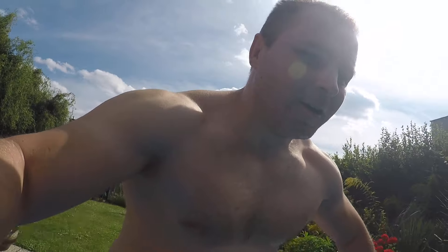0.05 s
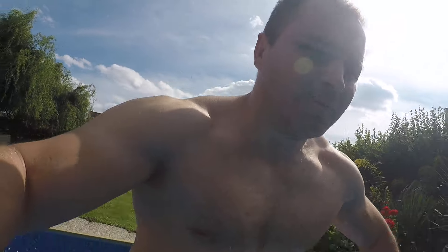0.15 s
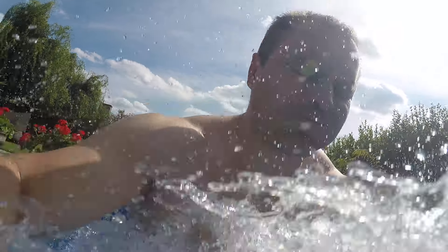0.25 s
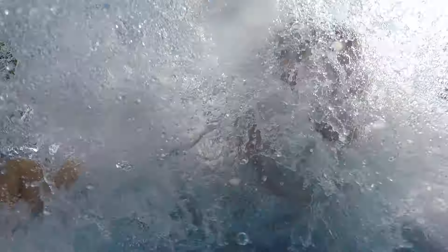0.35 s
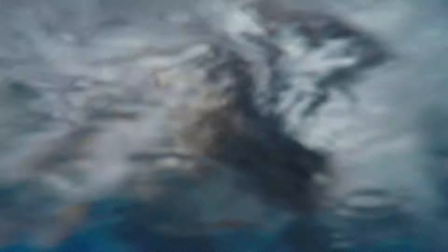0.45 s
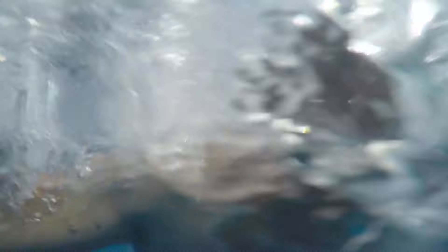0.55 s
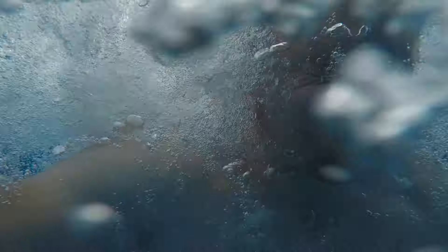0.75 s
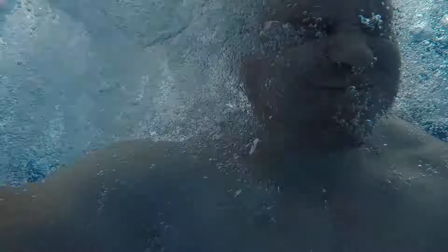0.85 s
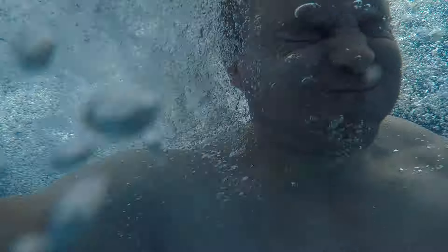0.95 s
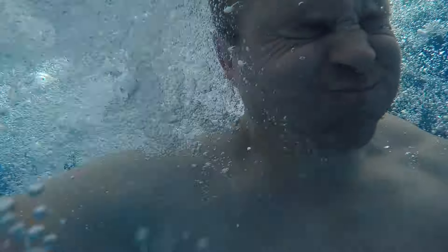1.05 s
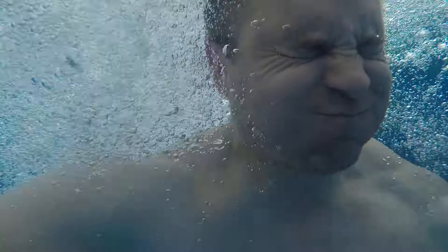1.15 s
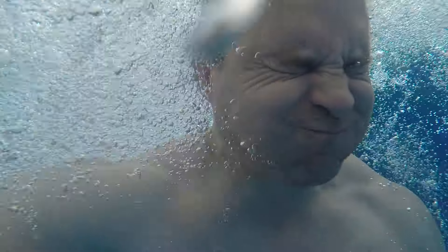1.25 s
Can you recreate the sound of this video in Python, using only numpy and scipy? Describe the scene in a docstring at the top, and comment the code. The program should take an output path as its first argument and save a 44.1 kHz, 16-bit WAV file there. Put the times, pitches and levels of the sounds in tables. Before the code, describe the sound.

A plunge into a garden pool heard from a camera in a waterproof case: brief spray hiss, violent distorted water slaps, foamy rush, a deep air-pocket boom, then quiet muffled gurgling, small bubble pings and low rumble.

```python
"""Water slaps a camera's waterproof housing as a body drops into a pool: short noise cracks and sine shoves,
hard enough to overload the microphone. A large air pocket booms as a rising sine; single bubbles glug and ping.
Clicks and noise hiss as spray through the housing's resonances. Swarms of ringing bubbles make the foam,
fizz and gurgle. Resonant noise buffets the case in air, low-passed noise rumbles under water."""
import sys
import numpy as np
from scipy import signal
from scipy.fft import rfft, irfft
from scipy.io import wavfile
from scipy.ndimage import uniform_filter1d

SR = 44100
rng = np.random.default_rng(int(sys.argv[2]) if len(sys.argv) > 2 else 0)


def pcm_store(signal):
    """Save signal as 16-bit PCM."""
    levels = np.round(np.clip(np.atleast_2d(signal), -1, 1) * 32767)
    wavfile.write(sys.argv[1], SR, levels.astype(np.int16).T)


N = 57330
T = np.arange(N) / SR

# the body breaking the surface: t/s, relative level/dB, decay/s
ENTRIES = [(0.1209, -20.5, 0.0042), (0.134, -16, 0.0022)]


def amp(db):
    """Decibels to gain."""
    return 10 ** (np.asarray(db) / 20)


def unit(x):
    """Scales to rms 1."""
    return x / np.sqrt(np.mean(x ** 2) + 1e-20)


def level(points, t=T):
    """Gain along a curve of t/s, level/dB."""
    return amp(np.interp(t, *np.transpose(points)))


def colour(x, points):
    """Minimum-phase filter with a spectrum of f/Hz, gain/dB; the result has rms 1."""
    hz, db = np.transpose(points)
    f_hz = abs(np.fft.fftfreq(2 * N, 1 / SR))
    log_gain = np.log(amp(np.interp(np.log(f_hz + 1), np.log(hz), db)))
    response = np.exp(np.conj(signal.hilbert(log_gain)))[:N + 1]
    return unit(irfft(rfft(x, 2 * N) * response)[:N])


def lowpass(x, hz, order=2):
    """Butterworth low-pass: takes off the treble."""
    return signal.sosfilt(signal.butter(order, min(hz, .45 * SR), fs=SR, output="sos"), x)


def resonate(x, hz, width_hz):
    """A steep resonance that can follow a moving pitch; the result has rms 1."""
    turn = np.exp(2j * np.pi * np.cumsum(hz * np.ones(N)) / SR)
    r = np.exp(-np.pi * width_hz / SR)
    # shift the pitch to 0 Hz, low-pass with a double pole, shift back
    return unit((turn * signal.lfilter([1], [1, -2 * r, r * r], x / turn)).real)


def steady(x, size):
    """Evens out slow level swings by the running rms over size samples."""
    return x / np.sqrt(abs(uniform_filter1d(x ** 2, size)) + 1e-9)


def drift(rate_hz):
    """A smooth random wander of rms 1: low-passed noise."""
    return unit(lowpass(rng.standard_normal(N), rate_hz))


def flutter(rate_hz, depth_db):
    """A random wobble of level, rms depth in dB."""
    return amp(depth_db * drift(rate_hz))


def clicks(per_s, spread_db):
    """Random clicks of either sign, a few much larger than the rest."""
    size = amp(spread_db * np.minimum(rng.exponential(1, N), 4))
    return (rng.random(N) < per_s / SR) * size * rng.choice([-1, 1], N)


def add(mix, s, sound):
    """Mixes a sound in at time s."""
    part = mix[max(round(s * SR), 0):][:len(sound)]
    part += sound[:len(part)]


def bubble(hz, decay_s, rise_s, glide_per_s):
    """A bubble rings, dies away and rises in pitch."""
    t = T[:N // 6]
    ring = np.sin(2 * np.pi * hz * (t + glide_per_s * t * t / 2))
    return ring * (1 - np.exp(-t / rise_s)) * np.exp(-t / decay_s)


def swarm(low_hz, high_hz, per_s, spread_db, cycles, chirp=0.0072, count=40):
    """A cloud of bubbles of many sizes, each ringing for a few cycles; rms 1."""
    out = np.zeros(N)
    for hz in np.geomspace(low_hz, high_hz, count) * rng.uniform(1.0, 1.03, count):
        decay_s = cycles / hz
        ring = bubble(hz, decay_s, .5 / hz, chirp / decay_s)[:int(8 * decay_s * SR)]
        out += signal.oaconvolve(clicks(per_s / count, spread_db), ring * hz)[:N]
    return unit(out)


def slaps():
    """Sheets of water crack against the housing (decaying noise) and shove it (short sine swells)."""
    # water slapping the housing: t/s, level/dB, decay/s
    cracks = [(0.3321, 4, 0.0012), (0.3361, -7.5, 0.0026), (0.3423, 3.5, 0.0024), (0.35, -7, 0.0023),
              (0.358, -9, 0.0022), (0.4624, -10.5, 0.011), (0.4645, 9, 0.0027), (0.4804, -9, 0.0071),
              (.547, -10.5, 0.0011), (.6, -28.5, 0.0067)]
    # spectrum of a slap: f/Hz, relative gain/dB
    crack_colour = [(60, -3), (220, 4), (500, -5), (1800, -4), (3900, -4.5), (4600, -10.5), (8000, -18),
                    (15500, -28.5)]
    # dull shoves of water against the case: t/s, level/dB, length/s, f/Hz
    shoves = [(0.339, -9, 0.006, 220), (0.353, -8.5, 0.013, 26.4), (0.398, -6.5, 0.032, 39.8),
              (0.408, -19, 0.0084, 168), (0.446, -2.5, 0.028, 29.8), (0.473, -6, 0.018, 64.8),
              (0.538, -26, 0.03, 76), (0.683, -8, 0.027, 76.7)]
    out = np.zeros(N)
    for s, db, decay_s in cracks:
        crack = steady(colour(rng.standard_normal(N), crack_colour), size=200)
        attack = np.minimum(T / 0.001, 1)
        add(out, s, amp(db) * crack * attack * np.exp(-T / decay_s))
    for s, db, length_s, hz in shoves:
        t = np.arange(0, length_s, 1 / SR)
        swell = np.sin(np.pi * t / length_s) ** .5
        add(out, s, amp(db) * np.sin(2 * np.pi * hz * t) * swell)
    return out


def bubbles():
    """The air pocket booms with a rising pitch; single large bubbles glug, small close ones ping."""
    # the big air pocket, a hard first swing then a long ring: t/s after it forms, level/dB
    pocket = [(0, 0), (.005, 2), (.016, 2), (.03, -11), (.09, -24), (.19, -38), (.23, -60)]
    # large bubbles: t/s, f/Hz, level/dB, decay/s
    glugs = [(0.554, 331.3, -12.5, 0.0097), (.597, 748, -22, 0.0084), (.665, 662, -19.5, 0.012),
             (0.685, 329, -2.5, 0.0049), (.699, 368.6, -8.5, 0.016), (0.97, 559, -18.5, 0.0049)]
    # small bubbles close to the case: t/s, f/Hz, level/dB, decay/s
    pings = [(.3318, 1950, -4, 0.0011), (0.631, 9100, -14.5, 0.00027), (0.6466, 2614, -7.5, 0.0012),
             (.661, 6560, -23.5, 0.0012), (0.7449, 3070, -17, 0.00065), (0.79, 3330, -24, 0.0026),
             (0.926, 1650, -28, 0.00077), (.939, 4770, -38, 0.00081), (0.9974, 5260, -37.5, 0.0017),
             (1.05, 3700, -35.5, 0.0024), (1.0758, 4070, -21.5, 0.0003), (1.12, 3240, -27.5, 0.0011),
             (1.134, 4100, -32, 0.0014), (1.19, 3500, -36.5, 0.0012), (1.2305, 1794, -27, 0.0064),
             (1.2501, 3000, -11.5, 0.0007), (1.26, 5920, -36, 0.00094)]
    pocket_s, pocket_hz, bend_per_s2 = .7035, 126.1, 3.0
    out = np.zeros(N)
    turns = np.cumsum(pocket_hz * (1 + bend_per_s2 * T ** 2)) / SR
    add(out, pocket_s, np.sin(2 * np.pi * turns) * level(pocket) * (T < pocket[-1][0]))
    for s, hz, db, decay_s in glugs:
        add(out, s, amp(db) * bubble(hz, decay_s, rise_s=0.00046, glide_per_s=0.97))
    for s, hz, db, decay_s in pings:
        add(out, s, amp(db) * bubble(hz, decay_s, rise_s=0.00033, glide_per_s=2.5))
    return out


def spray():
    """The body breaks the surface and countless drops hiss through the housing's shifting resonances."""
    # spray: t/s, relative level/dB
    spray_level = [(.123, -61), (.14, -32), (.178, -38), (.192, -30), (.37, -29.5), (.388, -24), (.44, -24),
                   (.455, -34.5), (.49, -31.5), (.56, -45.5), (.75, -100)]
    # spray heard through the housing: f/Hz, relative gain/dB
    spray_colour = [(200, -38), (1100, -17), (2500, -15.5), (3700, -6.5), (4800, -12), (5600, -16),
                    (8200, -23.5), (9800, -19), (11500, -29), (15500, -36)]
    # the housing's ring under the spray: f/Hz, width/Hz, relative level/dB
    housing = [(3480, 240, -11), (3930, 300, -5)]
    wander = .02  # rms share by which the ring shifts as water runs over the case
    entry_rise_s = 0.0023
    drops = unit(clicks(per_s=3400, spread_db=3.0)) + .5 * rng.standard_normal(N)
    drops = drops * flutter(rate_hz=50, depth_db=1.0)
    shift = 1 + wander * drift(rate_hz=84)
    ring = np.zeros(N)
    for hz, width_hz, db in housing:
        ring += amp(db) * resonate(rng.standard_normal(N), hz * shift, width_hz)
    ring = steady(ring, size=1000)
    bursts = np.zeros(N)
    for s, db, decay_s in ENTRIES:
        rise = np.clip((T - s) / entry_rise_s, 0, 1)
        bursts += amp(db) * rise * np.exp(-abs(T - s) / decay_s)
    return 0.81 * (colour(drops, spray_colour) + ring) * (level(spray_level) + bursts)


def foam():
    """Foam rushes and crackles round the case; under water a faint foam hiss stays, with a dull, sparse fizz."""
    # foam churning round the case: t/s, level/dB
    foam_level = [(.15, -91), (.24, -45), (.41, -28), (.452, -38.5), (.485, -27), (.56, -33), (.705, -32.5),
                  (.73, -44.5), (.79, -43), (.84, -54.5)]
    # spectrum of the foam: f/Hz, relative gain/dB
    foam_colour = [(300, -3.5), (1300, -5), (2400, -4.5), (4300, -14.5), (6000, -21), (15500, -35)]
    # tiniest bubbles crackling: t/s, level/dB
    crackle_level = [(.12, -72), (.5, -39), (.7, -51), (.8, -66), (.86, -90)]
    # fine bubbles fizzing under water: t/s, level/dB
    fizz_level = [(.5, -72), (.7, -42), (.86, -64), (1.18, -63), (1.22, -45), (1.3, -60)]
    # spectrum of the fizz: f/Hz, relative gain/dB
    fizz_colour = [(1000, 3.5), (2200, 1), (4200, -27), (8000, -29)]
    cloud = swarm(low_hz=578, high_hz=5970, per_s=2200, spread_db=4.5, cycles=3.3)
    surface = steady(colour(cloud + 0.69 * rng.standard_normal(N), foam_colour), size=1500)
    tiny = swarm(low_hz=4934, high_hz=14360, per_s=420, spread_db=7.0, cycles=5)
    fine = swarm(low_hz=806, high_hz=4370, per_s=260, spread_db=3.0, cycles=4.8)
    fizz = steady(colour(fine, fizz_colour), size=2000)
    return surface * level(foam_level) + tiny * level(crackle_level) + fizz * level(fizz_level)


def gurgle():
    """The muffled cloud of larger bubbles dragged under by the body; a few swell as wavering tones."""
    # gurgle of larger bubbles: t/s, level/dB
    gurgle_level = [(.2, -63.5), (.265, -45), (.5, -30), (.645, -42.5), (.7, -26), (.8, -30.5),
                    (.86, -34.5), (1.07, -39.5), (1.12, -34), (1.16, -38.5), (1.25, -30)]
    # spectrum of the gurgle: f/Hz, relative gain/dB
    gurgle_colour = [(120, -20.5), (220, -1), (340, -1), (560, -1.5), (780, -10.5), (1150, -17.5),
                     (5000, -56.5)]
    # wobbling bubbles that drift past under water: t/s, f/Hz, level/dB, length/s
    wobblers = [(0.754, 338, -24, .04), (0.843, 242, -37, 0.13), (.88, 540, -28.5, 0.081),
                (0.987, 257.4, -31.5, 0.03), (1.01, 489, -32, 0.054), (1.1, 225.4, -27.5, 0.052),
                (1.105, 445.4, -27.5, 0.058), (1.159, 238.7, -33, 0.053), (1.21, 505, -25.5, 0.05),
                (1.237, 605, -23.5, 0.025)]
    wobble = .03  # rms share by which their pitch wanders
    loose = swarm(low_hz=186.7, high_hz=949.0, per_s=450, spread_db=3.0, cycles=4.2)
    loose = loose + 0.384 * rng.standard_normal(N)
    out = steady(colour(loose, gurgle_colour), size=1800) * level(gurgle_level)
    for s, hz, db, length_s in wobblers:
        turns = np.cumsum(hz * (1 + wobble * drift(rate_hz=69))) / SR
        swell = np.sin(np.pi * np.minimum(T / length_s, 1)) * flutter(rate_hz=43, depth_db=3)
        add(out, s, amp(db) * swell * np.sin(2 * np.pi * turns))
    return out


def buffet():
    """Slow pressure swings of air on the falling case, and a deep rumble once it is under."""
    # air buffeting the case, before its low-pass: t/s, level/dB
    buffet_level = [(0, -29.5), (.3, -19.5), (.48, -11), (.53, -31.5), (.8, -53)]
    # deep rumble, silent before its first point: t/s, level/dB
    rumble_level = [(.6, -39.5), (1.08, -58.5), (1.115, -26.5), (1.16, -39), (1.3, -35)]
    swings = steady(resonate(rng.standard_normal(N), hz=25.4, width_hz=32), size=2400)
    air = lowpass(swings * level(buffet_level), hz=67, order=3)
    deep = steady(lowpass(rng.standard_normal(N), hz=172), size=2000)
    return air + deep * level(rumble_level) * (T > rumble_level[0][0])


def scene():
    """The plunge as the camera hears it; foam forms only once the body is in the water."""
    wet = T > ENTRIES[0][0]
    return (slaps() + bubbles() + spray() + foam() * wet + gurgle() + buffet())[None]


def record(dry):
    """The microphone overloads with a soft knee; then a 2 ms fade-out and the band limit."""
    edge_hz = 15550
    clipped = dry / (1 + dry ** 6) ** (1 / 6)
    faded = clipped * np.minimum(T[::-1] / .002, 1)
    band = signal.firwin(301, edge_hz, window=("kaiser", 8), fs=SR)
    return signal.oaconvolve(faded, band[None], "same")


dry = scene()
out = record(dry)
pcm_store(out)
```